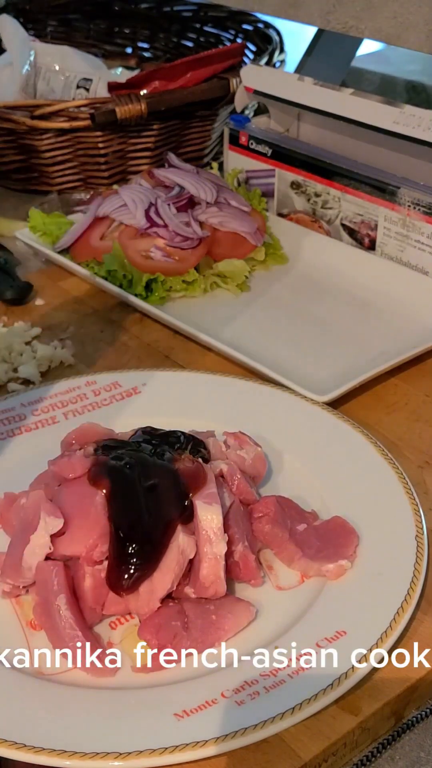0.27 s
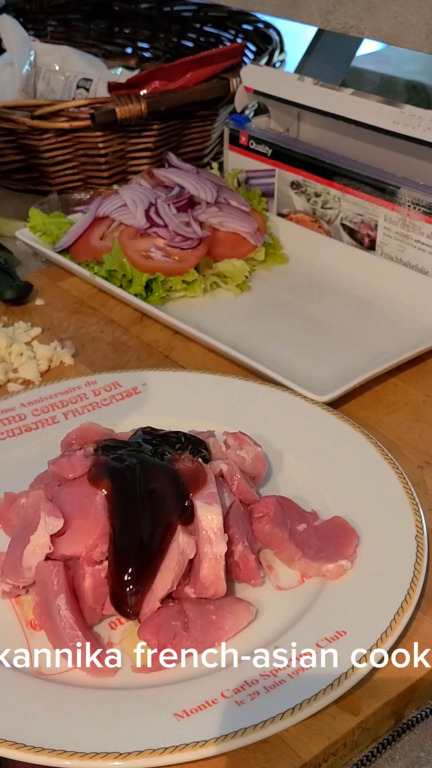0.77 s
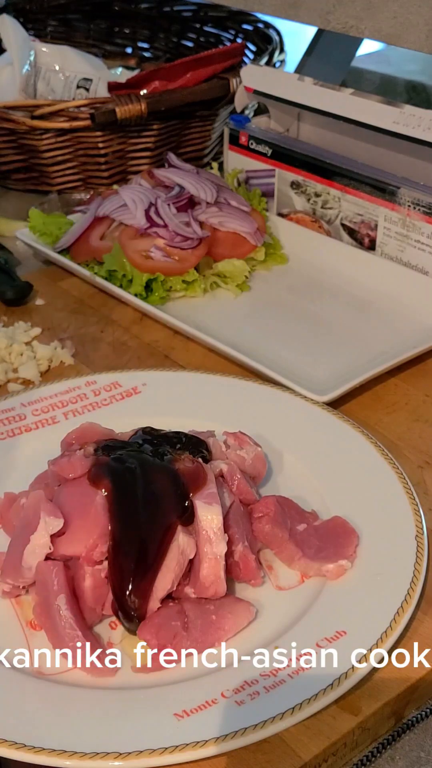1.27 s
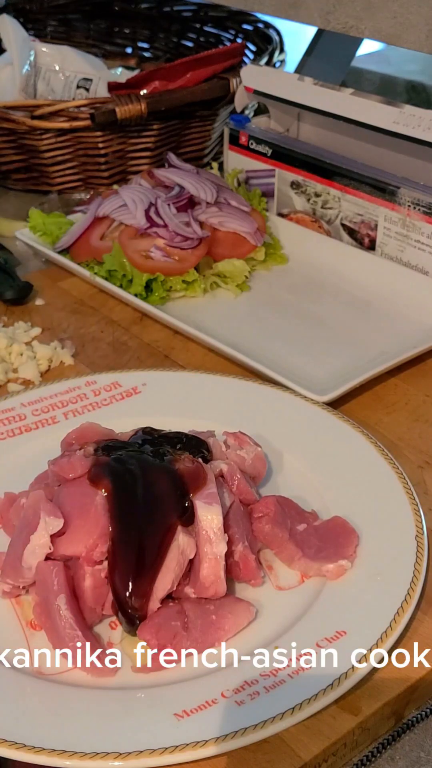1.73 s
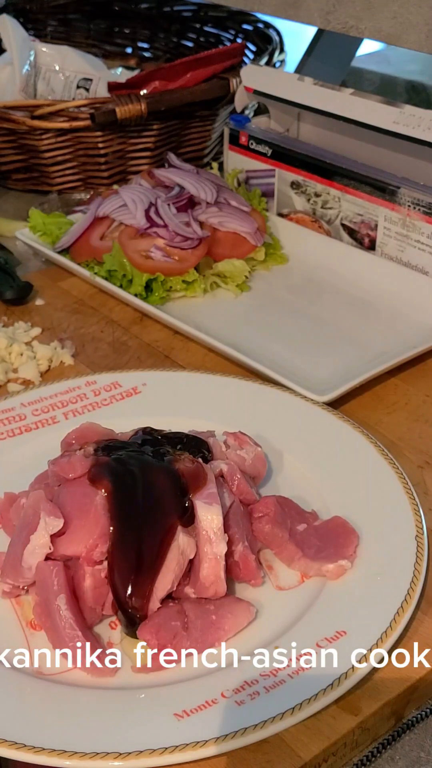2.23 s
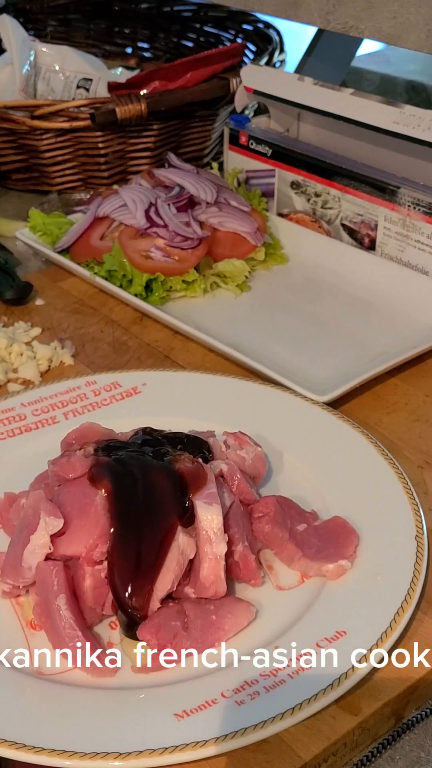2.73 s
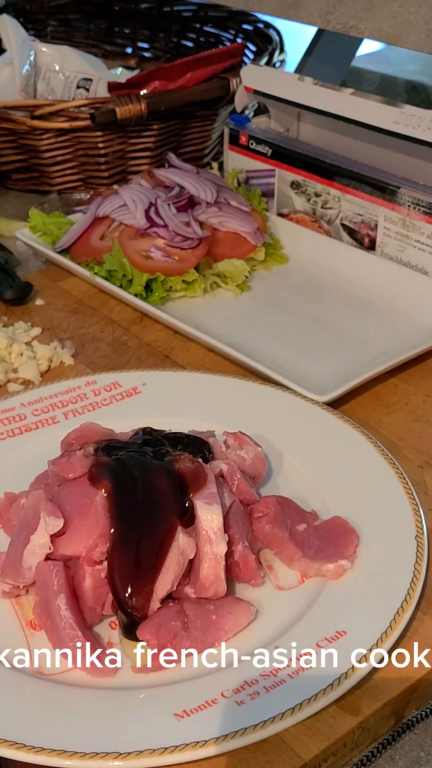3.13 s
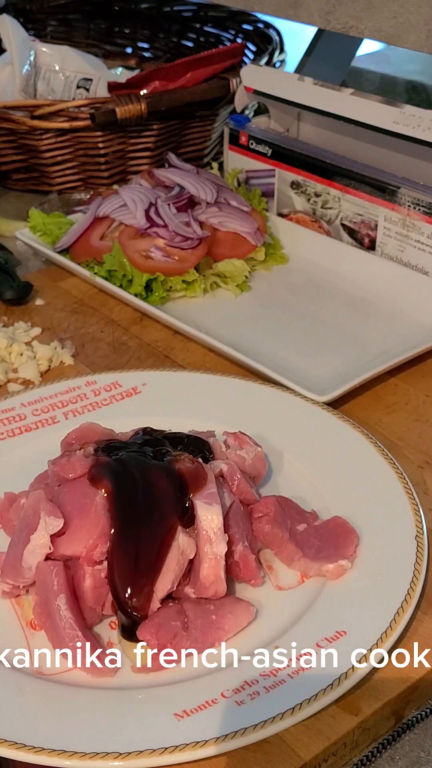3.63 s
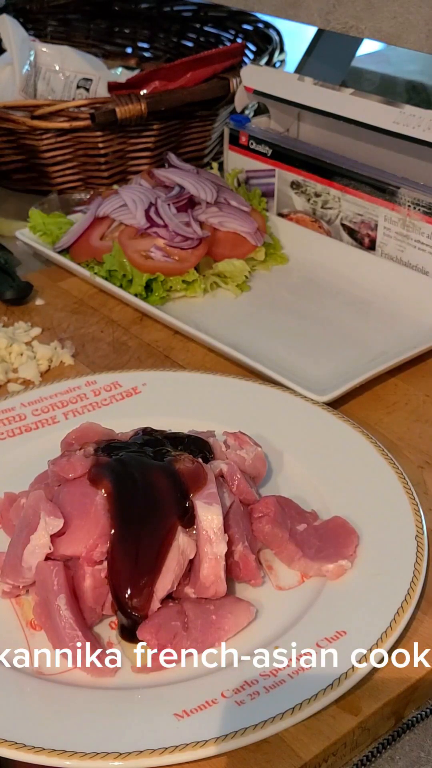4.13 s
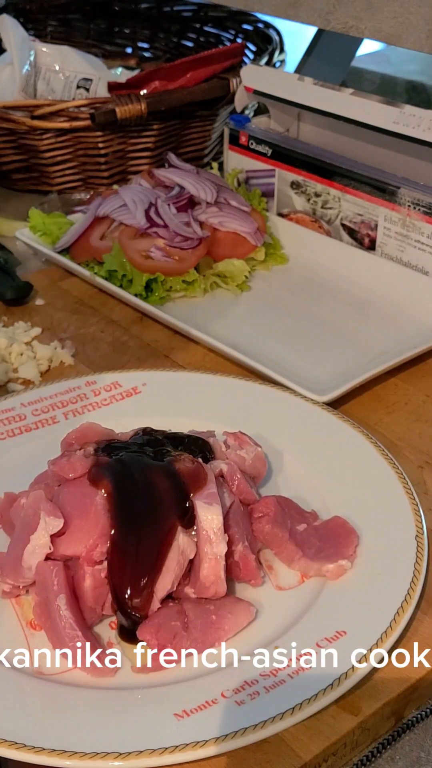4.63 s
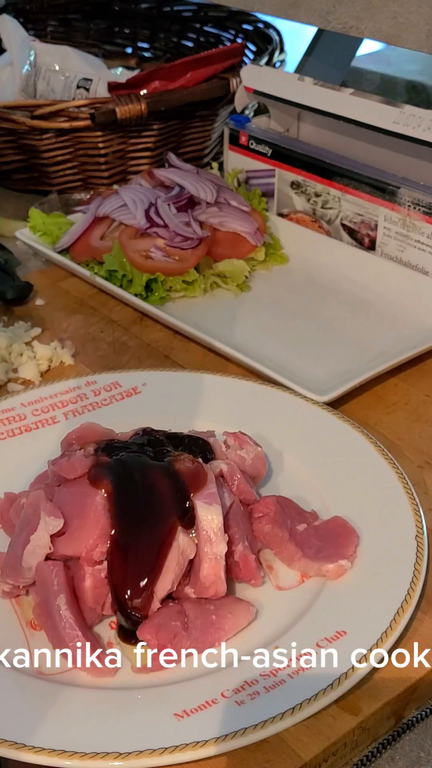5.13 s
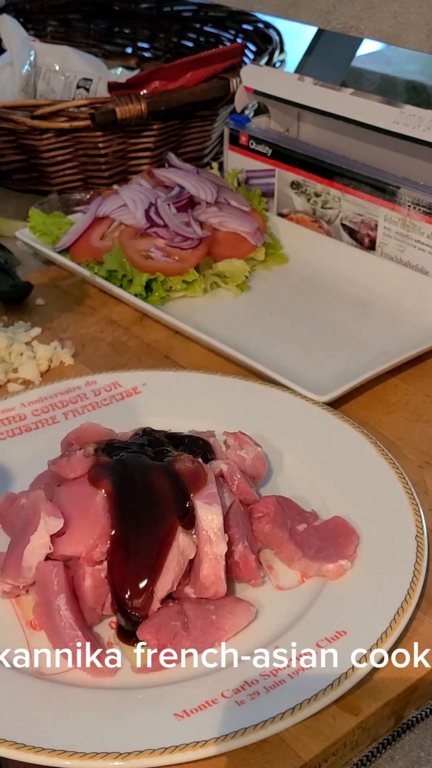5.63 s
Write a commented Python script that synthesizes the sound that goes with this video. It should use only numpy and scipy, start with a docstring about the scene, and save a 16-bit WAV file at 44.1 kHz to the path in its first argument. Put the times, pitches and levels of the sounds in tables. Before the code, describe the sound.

A quiet, low motor hum around 120 hertz, with soft airy noise and deep rumble, runs throughout a small kitchen. At the very start a bottle gives a short low gulp with a cap click; sharper plastic clicks come at 0.5 s and a brief slide at 0.7. At 1.06 s glass clinks brightly on china, in a tight cluster. Small clicks lead to a hollow plastic cap set down near 1.5, and a faint rub swells around 1.8. At 2.43 a heavy bottle lands on the wooden counter, the loudest blow, bouncing and rocking quickly until about 2.7. Soft dull knocks follow at 3.0-3.2, faint thin rim tinks at 3.5 and 3.9, and dry slides from 3.8, strongest at 4.35. At 4.81 a plastic lid snaps open in rapid cracks; light clicks and jar taps follow at 5.0-5.25, then mostly hum, with one tiny tick at 5.74.

```python
"""A sauce bottle gulps as it tips upright and caps click; something slides, glass clinks on china, and a hollow
cap is put down. A heavy bottle lands on the wooden counter and rocks; then come slides, light tinks on a thin
rim, a plastic lid snapping open and a nudged jar. Blows are sums of decaying modes and short noise bursts,
slides are swelling coloured noise, and gulps are decaying tones. A small room answers every blow; beneath lie
an appliance's hum, made of a wavering tone and resonant noise, and a low rumble with a faint swell midway."""
import sys
import numpy as np
from scipy import signal
from scipy.fft import rfft, irfft, next_fast_len
from scipy.io import wavfile
from scipy.ndimage import map_coordinates

SR = 44100
rng = np.random.default_rng(int(sys.argv[2]) if len(sys.argv) > 2 else 0)


def wav_record(signal):
    """Record a signal, one row per channel, as 16-bit PCM in the file named by sys.argv[1]."""
    frames = np.transpose(np.atleast_2d(signal))
    bounded = np.clip(frames, -1, 1)
    # unit amplitude maps onto the largest positive 16-bit level
    quanta = np.round(bounded * 32767).astype(np.int16)
    wavfile.write(sys.argv[1], SR, quanta)


N = 260057
T = np.arange(int(0.8 * SR)) / SR  # time axis of one blow, seconds

# Likeness of the two channels. Each row: frequency in Hz, correlation from 0 to 1.
CHANNEL_LIKENESS = [(30, 0.98), (120, 1), (300, 0.79), (700, 0.03), (2000, 0), (10000, 0)]
# Reverberation of the small room. Each row: frequency in Hz, t60 in seconds.
ROOM_DECAY = [(80, 0.58), (240, 0.2226), (500, 0.37), (1200, .42), (3500, 0.4), (7000, 0.3), (14000, 0.24)]
TOP_HZ = 16300  # upper limit of the sound

# Envelope of the deep rumble's faint swell: reference time in seconds, hold in seconds, swell in seconds
# per 20 dB, release in seconds per 20 dB, level in dB. The hold is negative: the flanks cross near 2.6 s,
# below that level, so the rumble rises and falls softly there.
RUMBLE_SWELL = (3, -0.7, 0.4, 0.34, -50.5)
RUMBLE_DB = -64.5  # steady part

# Spectrum of the room's steady air. Each row: frequency in Hz, relative density in dB per Hz.
AIR_SPECTRUM = [(12, -48.5), (20, -15.5), (74, -11.5), (116, -1.5), (177, -14), (285, -13.5), (624, -24.5),
                (678, -26), (1260, -26.5), (1610, -35), (2600, -35.5), (3340, -34), (3950, -34.5),
                (13900, -50), (16000, -57)]
# Resonances of the appliance's casing. Each row: centre in Hz, level in dB, width in Hz.
CASING_RESONANCES = [(118.8, -59.5, 9.9), (106.7, -61, 11), (283, -69, 21), (593.8, -70.5, 5.1),
                     (638.7, -72, 8), (3287, -70.5, 41)]
AIR_DB, MOTOR_DB, MOTOR_HZ = -51, -57.5, 120.4

# Things sliding over the wood. Each row: time of full pressure in seconds, hold in seconds,
# swell in seconds per 20 dB, rubbing level in dB, fizz level in dB, scrape resonance in Hz.
SLIDES = [(0.675, .04, 0.1, -54.5, -72.5, 2700), (1.815, .015, 0.74, -59, -60.5, 3280),
          (2.889, 0.099, 0.27, -57.5, -58, 5100), (3.826, 0.02, 0.12, -53.5, -61, 5300),
          (4.028, .12, 0.23, -60, -71, 4700), (4.283, 0.056, 0.19, -50.5, -78, 3900),
          (4.342, 0.14, 0.06, -44, -53, 3550)]
# Spectra of the dry rubbing and of the fizz. Each row: frequency in Hz, relative density in dB per Hz.
RUB_SPECTRUM = [(240, -47), (400, -14), (583, -6), (644, -13.5), (1100, -14), (1510, -12), (3920, -9),
                (6800, -17.5), (8000, -47), (10400, -40), (17600, -120)]
FIZZ_SPECTRUM = [(200, -30), (500, -7), (2000, -4), (7000, 9.5), (8200, 10), (12500, 1.5), (16000, -6.5)]
RUB_RELEASE_S, FIZZ_EDGE_S = 0.17, 0.07  # seconds per 20 dB: rubbing after a stroke, fizz on either side
SCRAPE_DB, SCRAPE_WIDTH = 7.5, 0.22  # the sliding thing's resonance: height, width as a share of its pitch

# Small contacts: clicks of caps and fingers, and thin ticks on a rim with little hollow part. # Each row: start
# in seconds, level in dB, ring in Hz, hollow part in dB.
CLICKS = [(0.0259, -35.5, 5860, 3), (0.3546, -52, 7000, -27), (0.4783, -45.5, 5600, -6),
          (0.53, -30, 6150, -6), (0.5511, -32, 5450, 5), (0.6637, -47, 12100, 0.5), (1.234, -41, 3060, 3),
          (1.279, -44, 8460, 6), (1.3106, -44, 2130, 11), (1.3713, -44, 2670, -6.5),
          (2.381, -46, 6500, -4.5), (3.3899, -44.5, 2700, -5), (3.8752, -40, 6060, -35),
          (4.072, -44.5, 5200, -32), (4.5564, -38.5, 5250, -33), (4.5726, -44.5, 4220, -26),
          (4.9717, -40, 7500, -25), (4.997, -41.5, 6500, 0.5), (5.0422, -36.5, 4700, 0.5),
          (5.242, -45, 3210, 9), (5.7408, -46.5, 11600, -20)]
# Noise spectrum of struck plastic. Each row: frequency in Hz, relative density in dB per Hz.
PLASTIC_SPECTRUM = [(200, 2.5), (800, -4.5), (1400, 0.5), (2300, -1), (4000, -2), (6000, -2.5),
                    (7200, -4.5), (8200, -0.5), (12500, -12), (16000, -21)]
CLICK_T60_S, CLICK_PAN_DB = 0.033, -7
SNAP_DB, SNAP_DB_PER_OCTAVE = -5, 12  # bright part of a click at 5 kHz; higher contacts snap more

# Cracks of the opening lid. Each row: start in seconds, level in dB.
LID_CRACKS = [(4.8094, -22), (4.8122, -18), (4.828, -20), (4.8418, -23.5), (4.846, -25.5)]
# Spectrum of the lid. Each row: frequency in Hz, relative density in dB per Hz.
LID_SPECTRUM = [(180, -46), (300, -17.5), (555, -8.5), (870, -31.5), (1210, -10.5), (1690, -18.5),
                (1870, -1), (2520, -12.5), (3080, -3.5), (3890, -17.5), (4990, -3.5), (7440, -4),
                (8090, -0.5), (12100, -7.5), (16000, -15)]
LID_T60_S, LID_TILT_DB = 0.032, 0.16  # decay of a crack; treble tilt per octave

# Blows on the plastic jar, the glass rim, the hollow cap, and of glass against china.
# Each row: start in seconds, level in dB, treble tilt in dB per octave.
JAR_TAPS = [(5.0554, -35.5, -3.5), (5.0654, -36, -4), (5.0994, -45, 3), (5.1805, -40.5, -4),
            (5.1964, -45, -1)]
RIM_TINKS = [(3.4601, -49.5, 2), (3.5215, -56, -8), (3.8762, -58.5, 7.5)]
CAP_DROPS = [(1.4257, -46.5, -3), (1.4716, -32.5, -0.5), (1.4845, -23.5, -0.5), (1.49, -30.5, 2.5)]
GLASS_CLINKS = [(1.055, -13, -0.5), (1.0578, -19.5, 1.5), (1.0612, -14.5, -2)]
# Modes of these objects. Each row: frequency in Hz, level in dB, t60 in seconds.
JAR_MODES = [(1343, -3.5, 0.16), (2090, -7.5, 0.14), (2350, -8.5, 0.086), (2590, -4, 0.055),
             (2820, -0.5, 0.085), (2920, -2, 0.074), (3266, -2.5, 0.091), (7300, -3, 0.038)]
RIM_MODES = [(2110, -8, 0.58), (4320, -4, 0.28), (4800, -7, 0.29), (5060, -2.5, 0.36), (5400, -4, 0.2),
             (5500, -4, 0.12), (6000, -0.5, 0.19), (6200, -11, 0.72), (6380, -13, 0.22), (10200, -13, .12),
             (11300, -12, 0.13), (11600, -16, .2), (12300, -16, 0.22), (12940, -11, .15)]
CAP_MODES = [(1182, -5, 0.039), (1260, -5.5, 0.052), (1480, -2, 0.046), (1530, -12, .04),
             (1670, -3.5, 0.06), (2700, -10, 0.04), (3680, -6.5, 0.067), (4820, -12, 0.044),
             (5540, -8, 0.04), (6650, -6.5, .04), (7080, -4.5, 0.031)]
GLASS_MODES = [(3297, -7, 0.255), (3653, -5.5, .28), (3741, -12, 0.25), (4124, -9, .2), (5141, -11, .24),
               (5500, -9, 0.24), (6200, -11, .28), (6570, -10, 0.28), (6610, -0.5, .26), (6860, -16.5, .2),
               (7241, -20, .3), (8940, -11, 0.27), (9370, -7.5, 0.18), (11570, -19.5, 0.262)]
# Spectrum of the crack of glass. Each row: frequency in Hz, relative density in dB per Hz.
GLASS_SPECTRUM = [(300, -50.5), (900, -36), (1400, -14.5), (1900, -20), (2600, -8), (3300, -4.5),
                  (3800, -8.5), (4400, -6), (5000, -0.5), (5700, -9), (6700, 3), (8200, -9), (9300, -9.5),
                  (10300, -18), (11600, -17.5), (14500, -28), (16000, -36.5)]

# Air gulping in the sauce bottle. Each row: start in seconds, level in dB, pitch in Hz,
# swell time constant in seconds, t60 in seconds.
GULPS = [(0.0, -26, 216, 0.011, 0.34), (0.0, -46, 394, 0.0036, 0.18), (0.0267, -34.5, 1398, 0.0016, 0.11)]

# Blows on the counter. Each row: start in seconds, level in dB.
KNOCKS = [(2.4295, 0), (2.44, -10), (2.465, -12.5), (2.496, -20.5), (3.026, -28.5), (3.059, -32),
          (3.1, -33), (3.184, -33.5), (3.211, -30), (4.343, -34.5), (4.55, -38.5), (5.179, -41.5)]
# Modes of the counter with the bottle on it. Each row: frequency in Hz, level in dB, t60 in seconds.
COUNTER_MODES = [(86.2, -22, 0.73), (107.8, -14.5, 0.46), (140, -17, 0.82), (215, -7, 0.32),
                 (252.3, -19.5, 0.6), (299, -9, 0.25), (329, -17.5, 0.14), (352, -23.5, 0.57),
                 (414, -13, 0.14), (500, -24.5, 0.26), (630, -26, 0.11), (712, -11, 0.076),
                 (1040, -25, 0.29), (1100, -26, 0.27), (1233, -15.5, 0.085), (1507, -17.5, 0.099),
                 (1672, -15, 0.072), (2377, -19.5, 0.2), (3270, -19, 0.1)]
# Dense part of a knock on wood. Each row: frequency in Hz, relative density in dB per Hz.
WOOD_SPECTRUM = [(29, -50.5), (50, -31.5), (81, -17.5), (125, -15), (170, -13.5), (314, -3.5), (428, -15),
                 (1010, -20.5), (1450, -27), (2020, -31), (2500, -30.5), (4200, -33.5), (4600, -39),
                 (15000, -40)]
HARD_HZ, HARD_DOUBLES_DB = 2457, 13  # contact cut-off of a 0 dB blow; doubles with every so many dB of force
# the landed bottle rocks on its base, weaker each time
ROCK_START_S, ROCK_PERIOD_S, ROCK_DB, ROCK_LOSS_DB = 2.593, 0.0625, -19, 8.5


def amp(db):
    """Level law: decibels to amplitude gain."""
    return 10 ** (np.asarray(db) / 20)


def unit(x):
    """Normalization: scale to rms 1."""
    return x / np.sqrt(np.mean(x ** 2) + 1e-20)


def along(points, hz):
    """Interpolation of (Hz, value) points on a logarithmic frequency axis."""
    f, v = np.transpose(points)
    return np.interp(np.log(hz + 1), np.log(f + 1), v)


def filtered(x, response):
    """Linear filtering: multiply the spectrum of x by a response of frequency."""
    n = x.shape[-1]
    padded = next_fast_len(n + 4096)
    spectrum = rfft(x, padded) * response(np.fft.rfftfreq(padded, 1 / SR))
    return irfft(spectrum, padded)[..., :n]


def noise(colour, size):
    """Partial coherence: stereo noise of rms 1 with a dB colour, its channels alike in the bass only."""
    def mid_side_response(hz):
        turn = np.arccos(np.clip(along(CHANNEL_LIKENESS, hz), -1, 1)) / 2
        return amp(colour(hz)) * [np.cos(turn), np.sin(turn)]

    mid, side = filtered(rng.standard_normal((2, size)), mid_side_response)
    return unit(np.array([mid + side, mid - side]))


def wobble(rate, size=N):
    """Band-limited fluctuation: a smooth random curve with rate knots a second."""
    knots = rng.standard_normal(int(size * rate / SR) + 4)
    return map_coordinates(knots, [np.arange(size) * rate / SR])


def fade(t60):
    """Exponential damping: a free decay by 60 dB in t60 seconds."""
    return np.exp(-np.log(1000) * T / max(t60, 1e-3))


def swelling(s, hold, swell, release):
    """Exponential growth and decay about time s; the flanks take the given seconds per 20 dB."""
    t = np.arange(N) / SR - s
    return 10 ** np.minimum(np.minimum(t / swell, (hold - t) / release), 0)


def panned(x, pan_db):
    """Interchannel level difference: a positive value leans to the first channel."""
    return x * amp([[pan_db / 2], [-pan_db / 2]])


def in_room(x, wet_db, build=0.0012):
    """Reverberation: convolve with a noise tail that builds up, then decays at its own rate in each band."""
    hz, t, z = signal.stft(noise(lambda hz: 0 * hz, len(T)), SR, nperseg=256)
    decay = np.exp(-np.log(1000) * t / along(ROOM_DECAY, hz)[:, None])
    tail = signal.istft(z * decay, SR, nperseg=256)[1][:, :len(T)]
    tail = unit(tail * (1 - np.exp(-T / build)) ** 2) / np.sqrt(len(T))
    return x + amp(wet_db) * signal.fftconvolve(x, tail, axes=1)[:, :len(T)]


def add(track, s, x):
    """Superposition: mix x into the track at time s."""
    part = track[:, max(round(s * SR), 0):][:, :x.shape[1]]
    part += x[:, :part.shape[1]]


def rumble():
    """Low-frequency noise: a steady deep rumble with a faint swell near 2.6 s."""
    s, hold, swell, release, db = RUMBLE_SWELL
    # Each row: frequency in Hz, relative density in dB per Hz.
    deep = [(20, -11.0), (45, -10.0), (110, 0.5), (220, -5.0), (500, -39), (1500, -92.0)]
    level = amp(RUMBLE_DB) + amp(db) * swelling(s, hold, swell, release)
    return level * noise(lambda hz: along(deep, hz), N)


def appliance():
    """Forced vibration: a slightly wavering motor tone and casing resonances, over the room's steady air."""
    air = amp(AIR_DB) * noise(lambda hz: along(AIR_SPECTRUM, hz), N)
    casing = np.zeros((2, N))
    for centre_hz, db, width_hz in CASING_RESONANCES:
        resonance = lambda hz: -20 * np.log10(1 + ((hz - centre_hz) / width_hz) ** 2)
        casing += amp(db) * noise(resonance, N)
    tone = np.sin(2 * np.pi * MOTOR_HZ * np.arange(N) / SR + 0.5 * wobble(4))
    motor = amp(MOTOR_DB + 0.67 * wobble(6.01)) * unit(tone)
    return panned(air + casing + motor, pan_db=-3.5)


def slides():
    """Dry friction: rubbing noise swells around each thing's resonance, with a fizz near full pressure."""
    out = np.zeros((2, N))
    fizz = noise(lambda hz: along(FIZZ_SPECTRUM, hz), N)
    for s, hold, swell, rub_db, fizz_db, scrape_hz in SLIDES:
        scrape = lambda hz: SCRAPE_DB / (1 + ((hz / scrape_hz - 1) / SCRAPE_WIDTH) ** 2)
        rub = noise(lambda hz: along(RUB_SPECTRUM, hz) + scrape(hz), N)
        out += amp(rub_db) * swelling(s, hold, swell, RUB_RELEASE_S) * rub
        out += amp(fizz_db) * swelling(s, hold, FIZZ_EDGE_S, FIZZ_EDGE_S) * fizz
    # the grain of the wood catches and lets go
    grain_db = 1.0 * wobble(150) + 0.75 * wobble(600)
    return panned(out * amp(grain_db), pan_db=-5.5)


def clicks():
    """Small impact: a noise burst with one broad resonance, a hollow part and a snap growing with pitch."""
    out = np.zeros((2, N))
    for s, db, ring_hz, hollow_db in CLICKS:
        snap_db = SNAP_DB + SNAP_DB_PER_OCTAVE * np.log2(ring_hz / 5000)
        touch = [(1800, hollow_db), (2600, 0), (7200, 0), (8500, snap_db)]  # Hz, dB
        resonance = lambda hz: 11 / (1 + ((hz - ring_hz) / (0.09 * ring_hz)) ** 2)
        burst = noise(lambda hz: along(PLASTIC_SPECTRUM, hz) + along(touch, hz) + resonance(hz), len(T))
        tap = burst * fade(CLICK_T60_S) * (1 - np.exp(-T / 0.00035))
        add(out, s, amp(db) * in_room(tap, wet_db=-3.5))
    return panned(out, CLICK_PAN_DB)


def snaps():
    """Sudden release: the lid slips over its catch in a few quick cracks of damped noise."""
    out = np.zeros((2, N))
    tilt = lambda hz: LID_TILT_DB * np.log2((hz + 1) / 6000)
    for s, db in LID_CRACKS:
        crack = noise(lambda hz: along(LID_SPECTRUM, hz) + tilt(hz), len(T)) * fade(LID_T60_S)
        add(out, s, amp(db) * in_room(crack, wet_db=-4.5))
    return panned(out, pan_db=-2)


def struck(hits, modes, colour, crack_db, ring_db, damped_db, wet_db, phase_wander, rise):
    """Modal excitation: a short crack sets modes ringing; part of the ring dies at once in the contact."""
    out = np.zeros((2, N))
    for s, db, tilt_db in hits:
        tilt = lambda hz: tilt_db * np.log2((hz + 500) / 5000)
        ring = np.zeros((2, len(T)))
        for hz, level, t60 in modes:
            # random phase wander roughens each mode; the two channels start at different phases
            phase = phase_wander * wobble(110.4, size=len(T)) + rng.normal(0, 0.95, (2, 1))
            gain = amp(level + tilt(hz) + rng.normal(0, 1))
            ring += gain * fade(t60) * np.sin(2 * np.pi * hz * T + phase)
        crack = noise(lambda hz: along(colour, hz) + tilt(hz), len(T)) * fade(0.019)
        ring_decay = amp(ring_db) + amp(damped_db) * fade(0.029)
        blow = (amp(crack_db) * crack + ring * ring_decay) * (1 - np.exp(-T / rise))
        add(out, s, amp(db) * in_room(blow, wet_db))
    return out


def tableware():
    """Material damping: glass rings long, plastic briefly; each object is panned, the cap and the clinks alike."""
    jar = struck(JAR_TAPS, JAR_MODES, PLASTIC_SPECTRUM, crack_db=7.0, ring_db=-11.5, damped_db=-5,
                 wet_db=-5, phase_wander=0.99, rise=0.0026)
    tinks = struck(RIM_TINKS, RIM_MODES, GLASS_SPECTRUM, crack_db=0, ring_db=-5, damped_db=-7,
                   wet_db=-3, phase_wander=1.07, rise=0.001)
    cap = struck(CAP_DROPS, CAP_MODES, PLASTIC_SPECTRUM, crack_db=-3.0, ring_db=-15.5, damped_db=-1.5,
                 wet_db=-4.5, phase_wander=1.7, rise=0.00059)
    clinks = struck(GLASS_CLINKS, GLASS_MODES, GLASS_SPECTRUM, crack_db=0.5, ring_db=-20, damped_db=-12.0,
                    wet_db=-5.0, phase_wander=1.0, rise=0.000417)
    return panned(jar, -1.5) + panned(tinks, -5.5) + panned(cap, -5) + panned(clinks, -5)


def gulps():
    """Cavity resonance: air in the bottle's belly and neck rings in damped tones of fixed pitch."""
    out = np.zeros((2, N))
    for s, db, hz, swell, t60 in GULPS:
        tone = np.sin(2 * np.pi * hz * T) * (1 - np.exp(-T / swell)) * fade(t60)
        add(out, s, amp(db) * in_room(panned(tone, pan_db=-2.0), wet_db=-13.5))
    return out


def knocks():
    """Impact on a panel: the bottle bounces and rocks, the counter's modes ring; weak contacts stay dull."""
    out = np.zeros((2, N))
    rocking = [(ROCK_START_S + k * ROCK_PERIOD_S, ROCK_DB - k * ROCK_LOSS_DB) for k in range(3)]
    # the top is too small to radiate deep bass
    radiation = signal.butter(2, 70, "high", fs=SR, output="sos")
    for s, db in KNOCKS + rocking:
        hard_hz = HARD_HZ * 2 ** (db / HARD_DOUBLES_DB)
        contact = lambda hz: 1 / (1 + (hz / hard_hz) ** 2)

        def mode(hz, t60):
            """Damped oscillation whose phase drifts at random after the blow."""
            phase_drift = 0.7 * wobble(35, size=len(T)) * (1 - fade(0.2))
            return contact(hz) * fade(t60) * np.sin(2 * np.pi * hz * T + phase_drift)

        bounce = mode(hz=322, t60=0.075)  # on the springy top
        ring = np.zeros(len(T))
        for k, (hz, level, t60) in enumerate(COUNTER_MODES):
            build_up = 1 - np.exp(-T * hz / 1.8)  # each panel mode needs a couple of cycles
            ring += (-1) ** k * amp(level + rng.normal(0, 1)) * mode(hz, t60) * build_up
        brightness = lambda hz: 20 * np.log10(contact(hz)) + 3 * np.log2(1 + hz / 1000)
        thud = noise(lambda hz: along(WOOD_SPECTRUM, hz) + brightness(hz), len(T)) * fade(0.22)
        blow = amp(-3.5) * bounce + amp(-5) * ring + amp(-12) * thud
        blow = signal.sosfilt(radiation, blow * (1 - np.exp(-T / 0.001)))
        add(out, s, amp(db) * panned(in_room(blow, wet_db=-14.5, build=0.011), pan_db=-2.0))
    return out


def scene():
    """Superposition of all the handling over the hum and rumble."""
    background = rumble() + appliance()
    return background + slides() + clicks() + snaps() + tableware() + gulps() + knocks()


def record(dry):
    """Overall tone colour: a dip near 7.9 kHz, a lift above, nothing past the upper limit."""
    tone_colour = [(5000, 0.5), (7200, 2.0), (7900, -7.5), (10000, -1.0), (12000, 5)]  # Hz, dB
    return filtered(dry, lambda hz: amp(along(tone_colour, hz)) * (hz < TOP_HZ))


dry = scene()
out = record(dry)
wav_record(out)
```